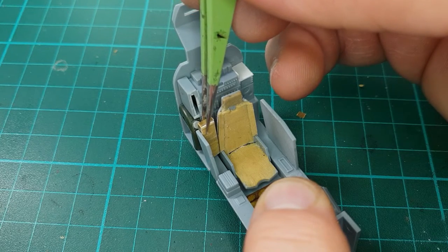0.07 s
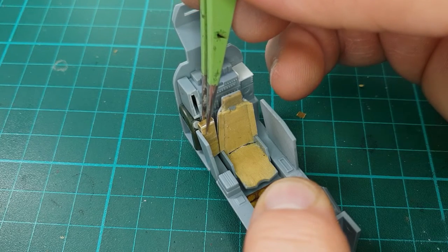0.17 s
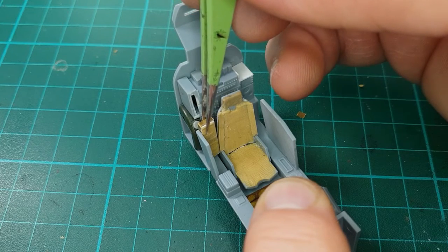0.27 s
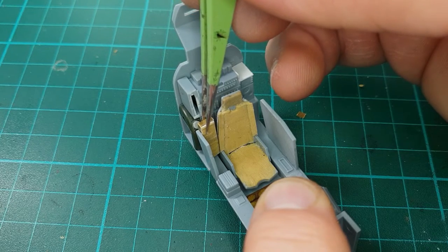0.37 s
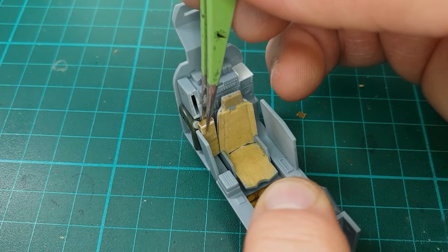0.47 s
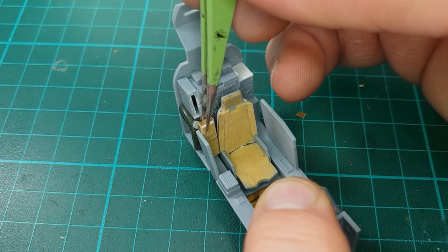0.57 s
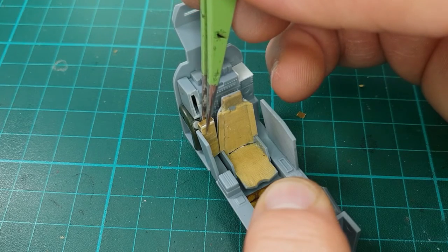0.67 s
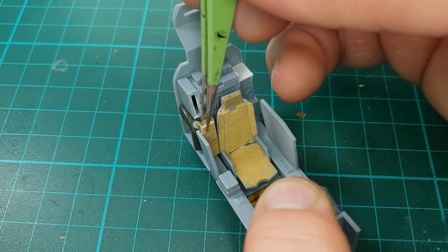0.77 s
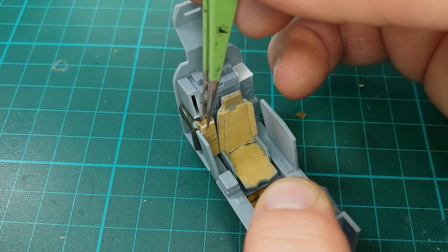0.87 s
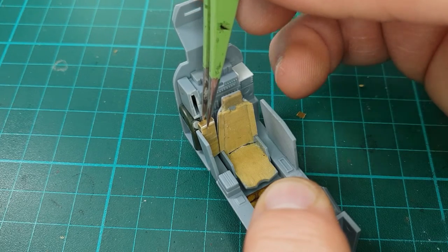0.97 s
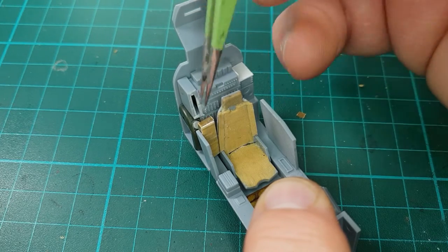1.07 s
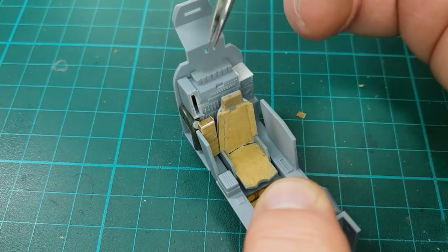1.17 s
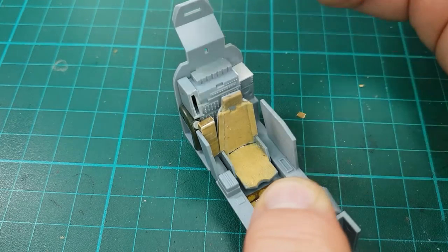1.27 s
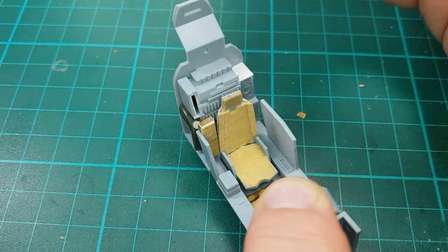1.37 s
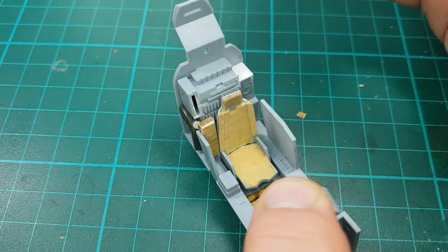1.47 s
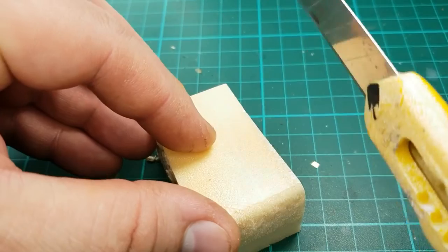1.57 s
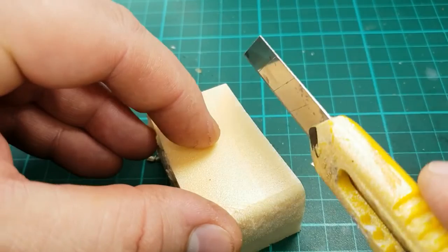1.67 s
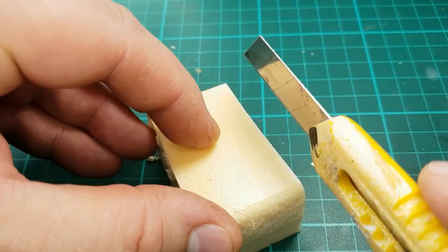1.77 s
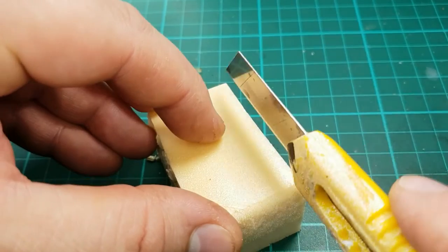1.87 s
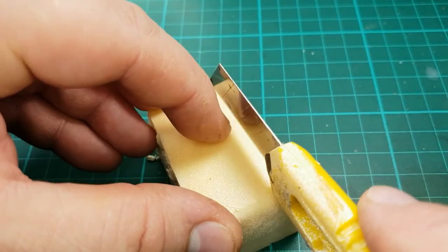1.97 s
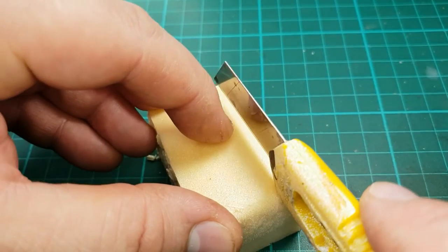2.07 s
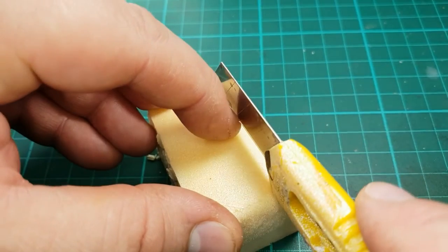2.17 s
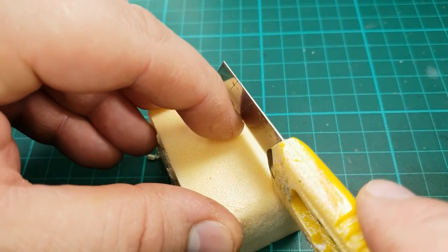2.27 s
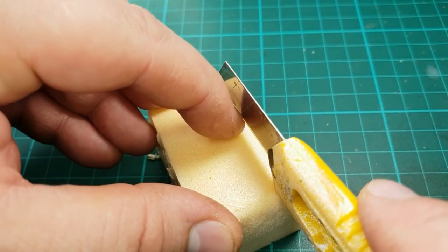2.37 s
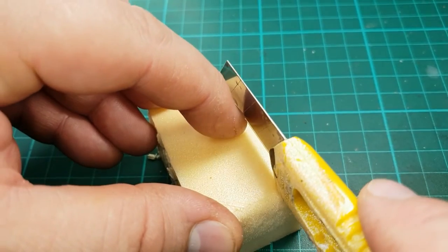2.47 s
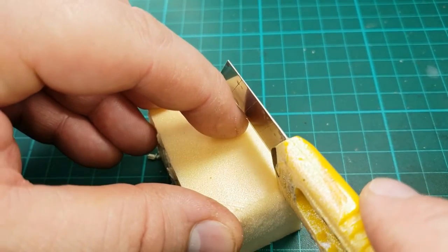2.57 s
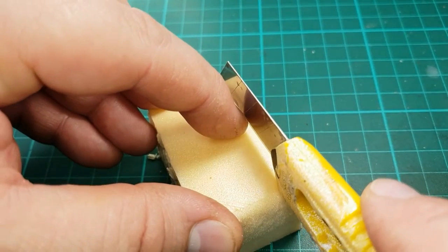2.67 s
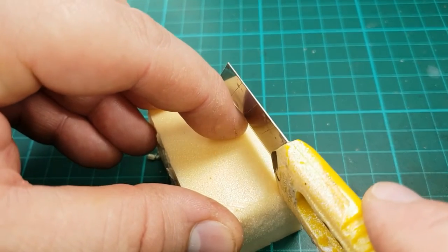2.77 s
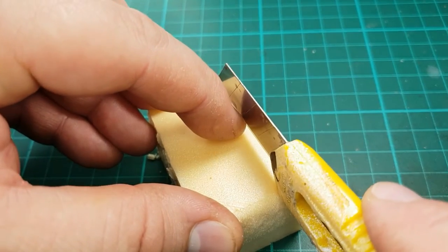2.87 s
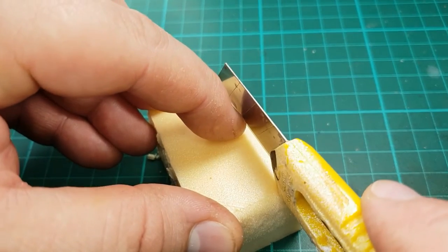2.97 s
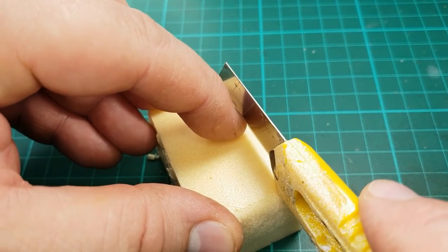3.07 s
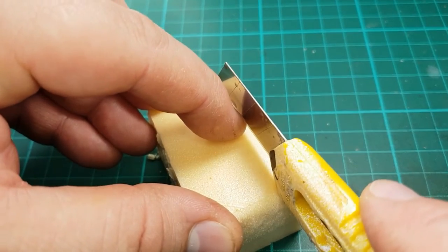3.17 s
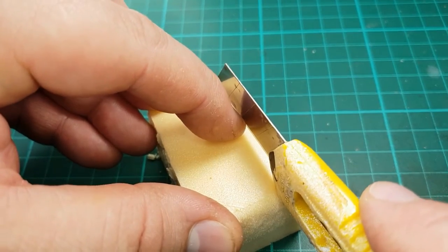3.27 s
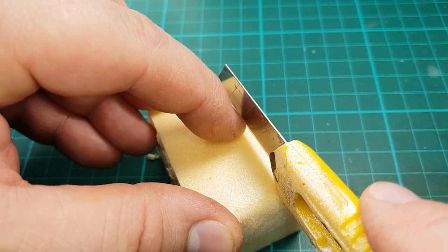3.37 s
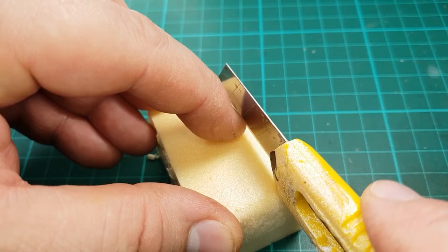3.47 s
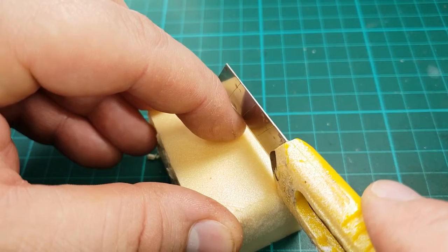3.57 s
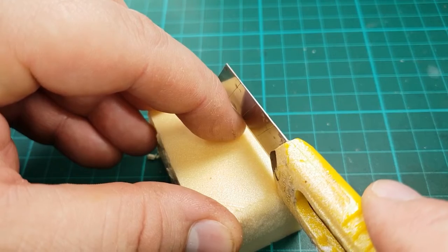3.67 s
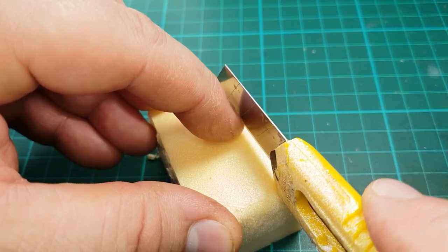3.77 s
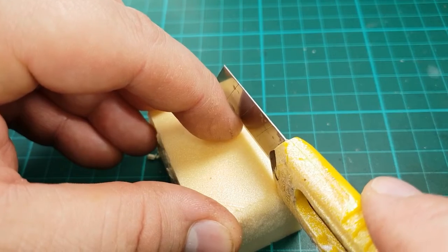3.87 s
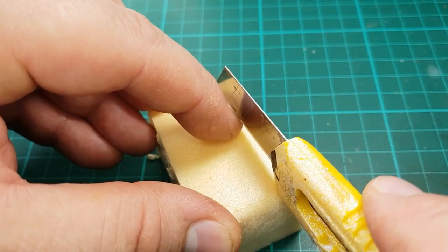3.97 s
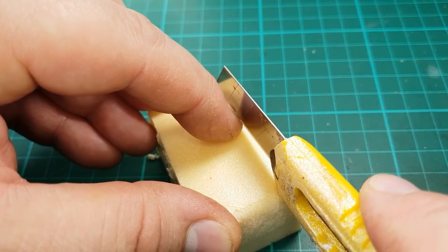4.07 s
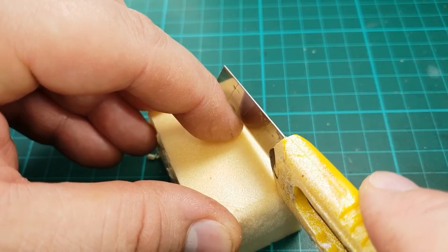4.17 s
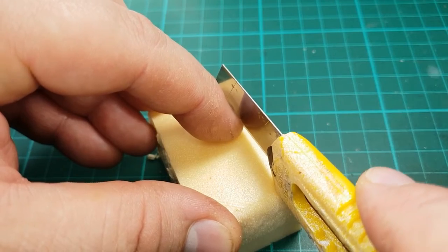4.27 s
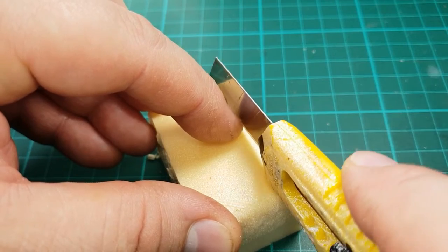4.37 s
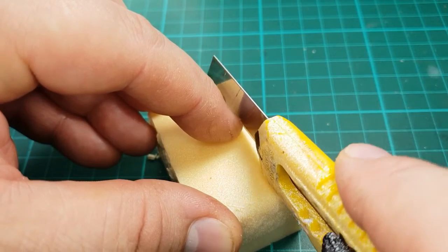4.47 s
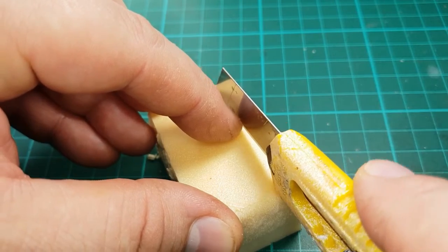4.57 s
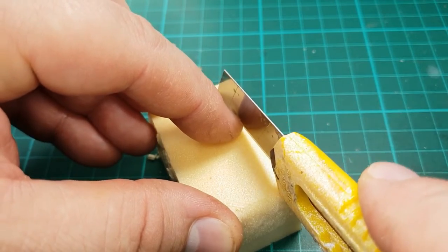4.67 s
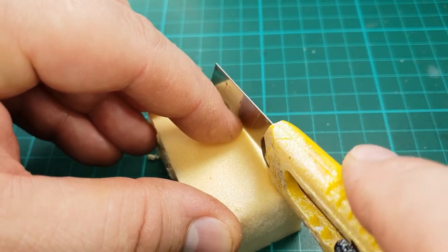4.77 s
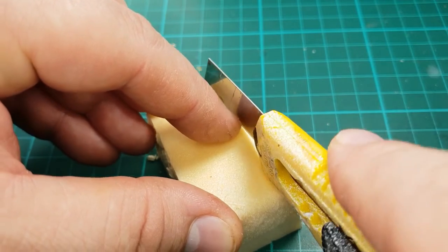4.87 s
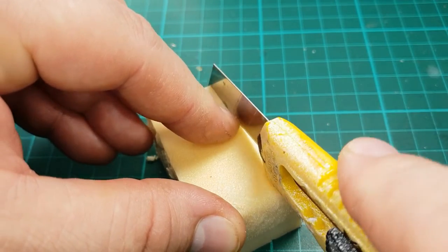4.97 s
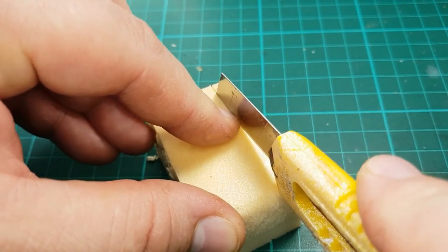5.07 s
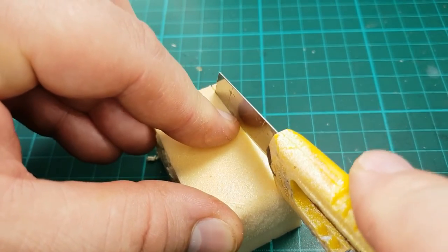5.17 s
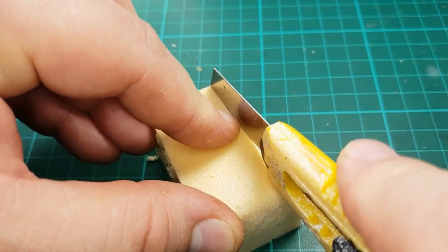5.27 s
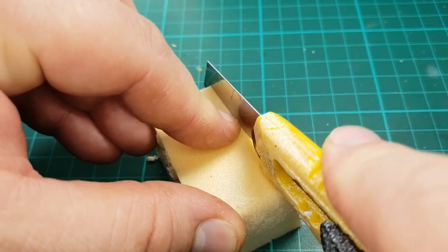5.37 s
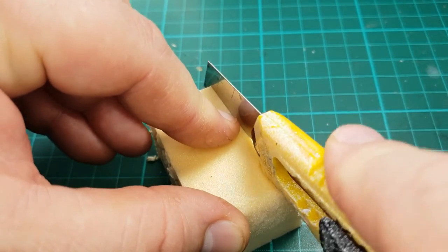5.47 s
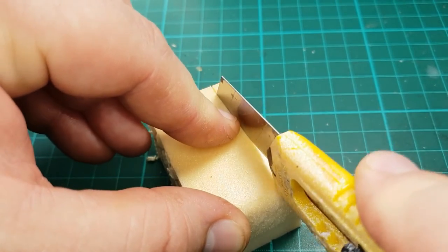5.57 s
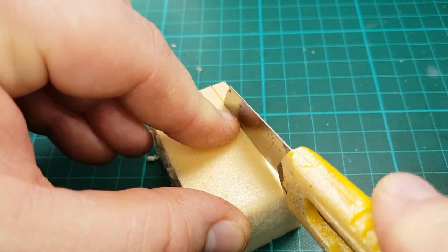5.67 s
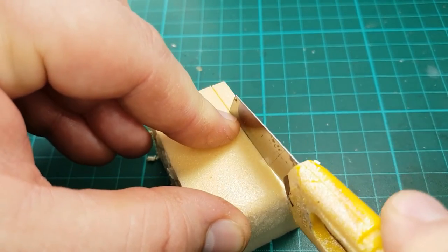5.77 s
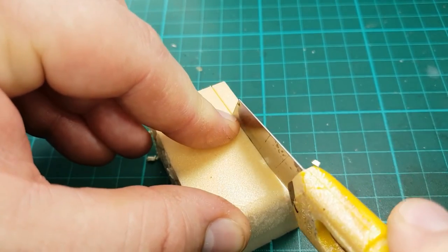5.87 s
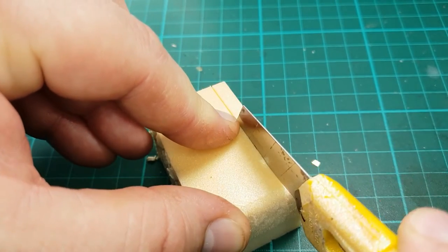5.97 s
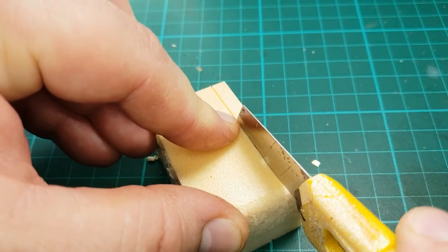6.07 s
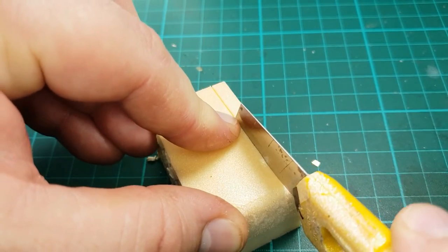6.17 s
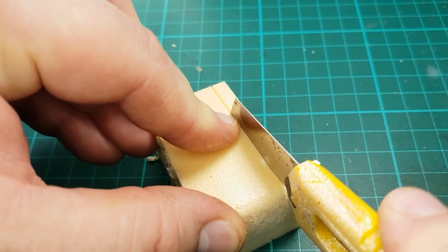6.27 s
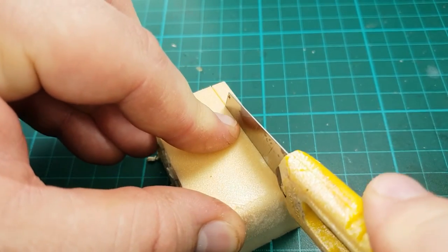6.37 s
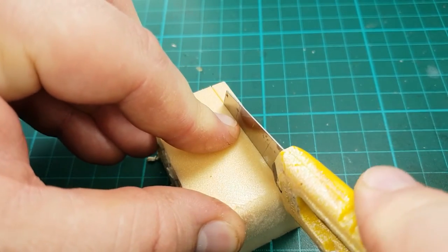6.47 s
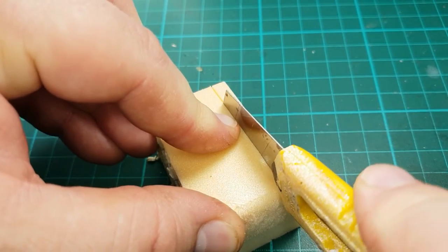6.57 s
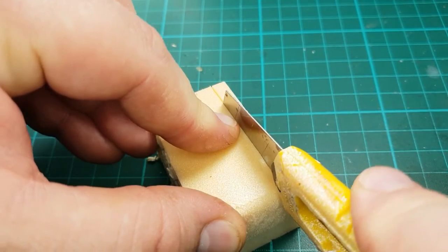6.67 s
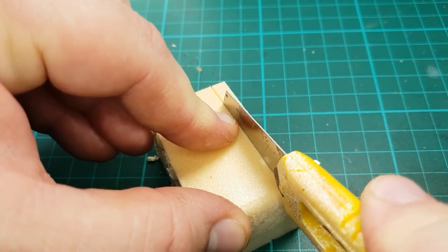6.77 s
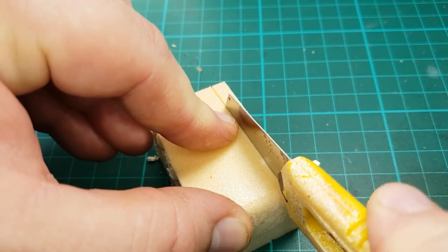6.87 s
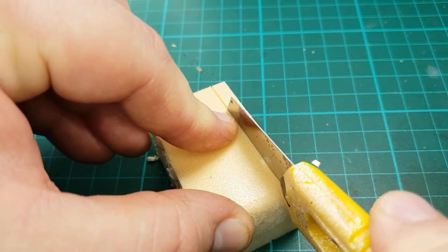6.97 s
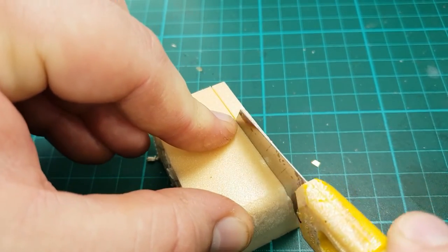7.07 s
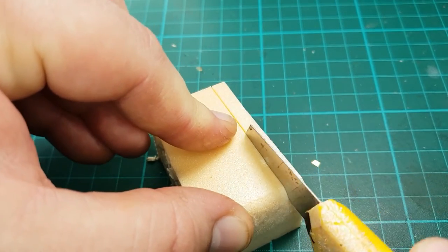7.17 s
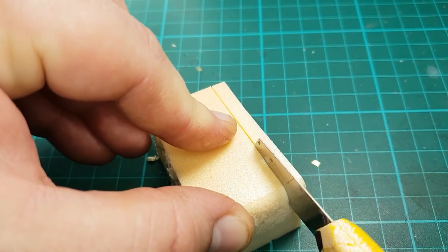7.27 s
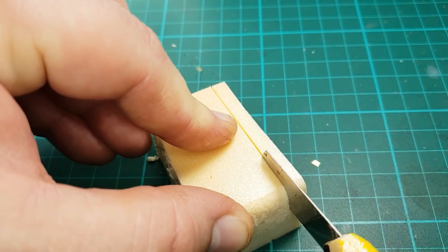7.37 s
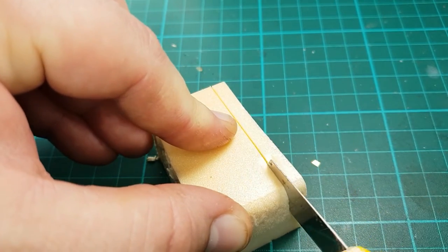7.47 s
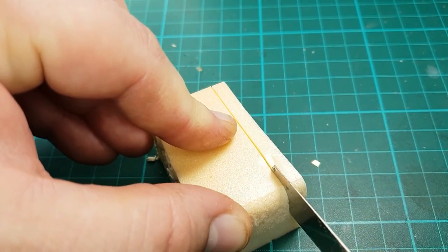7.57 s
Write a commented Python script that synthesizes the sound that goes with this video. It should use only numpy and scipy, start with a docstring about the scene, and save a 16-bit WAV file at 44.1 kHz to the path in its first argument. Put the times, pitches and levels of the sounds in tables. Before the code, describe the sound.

A close, dry view of bench work in a small room. From 0 to 1.3 s there is only quiet air noise and a faint wavering low hum, with a tiny click near 1.1 s and soft thumps around 1.4 s. At 1.6 s a low rumble steps up and slowly grows, as fingers scuff the foam with grainy rubs and little ticks, sparse until 3.9 s. A sharp tick at 4.0 s starts a run of small ticks. From 4.3 s the blade saws in short, bright, fizzing rasps. At 4.9 s it slips free with a loud, hard snap. Strokes continue, with a crisp tick at 5.2 s and soft hollow bench notes at 5.6 and 6.3 s. Cutting eases around 6.5 s amid a thin foam rustle; a dull thump lands at 6.8 s, then stronger rasps from 7.0 s fade toward 7.6 s.

```python
"""Close to the microphone in a small room: steady air noise and a faint, wavering hum that comes and goes.
At 1.58 s the low rumble steps up, then slowly grows; fingers scuff a small foam block, blade and foam tick.
From 4.3 s a snap-off craft knife saws it on a cutting mat: each stroke is a burst of foam cells, filtered by
resonances of knife and block. At 4.9 s the blade slips free with a loud snap; at 5.6 and 6.3 s something
on the bench rings as decaying sines. Thumps, knocks and hollow rubs are short bands of noise."""
import sys
import numpy as np
from scipy import signal
from scipy.fft import rfft, irfft
from scipy.io import wavfile
from scipy.ndimage import uniform_filter1d

SR = 44100
rng = np.random.default_rng(int(sys.argv[2]) if len(sys.argv) > 2 else 0)


def wav_record(signal):
    """Record a signal, one row per channel, as 16-bit PCM in the file named by sys.argv[1]."""
    frames = np.transpose(np.atleast_2d(signal))
    bounded = np.clip(frames, -1, 1)
    # unit amplitude maps onto the largest positive 16-bit level
    quanta = np.round(bounded * 32767).astype(np.int16)
    wavfile.write(sys.argv[1], SR, quanta)


N = 335601
EDGE_HZ = 15900  # upper band limit

# bright colour of bursting cells: hz, relative_db (per Hz)
FIZZ_COLOUR = [(1000, -42.5), (5000, -3), (6800, -7), (8000, 0), (10000, 4), (12000, 5.5), (13200, 3.5),
               (16000, -4)]


def amp(db):
    """Decibels to gain."""
    return 10 ** (np.asarray(db) / 20)


def evened(x):
    """Scales to rms 1."""
    return x / np.sqrt(np.mean(x ** 2) + 1e-20)


def read(points, hz):
    """Reads a spectrum in dB on a log-frequency axis."""
    f, value = np.transpose(points)
    return np.interp(np.log(hz + 1), np.log(f + 1), value)


def add(mix, s, sound):
    """Mixes a sound in at time s, in place."""
    part = mix[..., round(s * SR):][..., :sound.shape[-1]]
    part += sound[..., :part.shape[-1]]


def noise(points):
    """Noise of rms 1 with the given spectrum."""
    spectrum = rfft(rng.standard_normal(N))
    colour = amp(read(points, np.fft.rfftfreq(N, 1 / SR)))
    return evened(irfft(spectrum * colour, N))


def drift(per_s):
    """A random wander of rms 1, straight between per_s random values a second."""
    knots = rng.standard_normal(4000)
    return evened(np.interp(np.arange(N) / SR * per_s, np.arange(len(knots)), knots))


def swell(start, length, rise, fall):
    """Eases from 0 up to 1, holds, and eases back to 0."""
    t = np.arange(N) / SR - start
    onset = np.sin(np.pi / 2 * np.clip(t / rise, 0, 1))
    release = np.sin(np.pi / 2 * np.clip((length - t) / fall, 0, 1))
    return onset * release


def shares(body_db):
    """Splits unit power between dull body and bright fizz."""
    return np.array([[amp(body_db)], [1]]) / np.hypot(amp(body_db), 1)


def background(air_db=-64.0, step_s=0.016):
    """Steady air, a low rumble that steps up at 1.58 s, then slowly grows, and a wavering hum."""
    # the steady floor: hz, relative_db (per Hz)
    air_colour = [(12, -29), (22, -6.5), (58, -7.5), (92, -7), (150, -17), (200, -21), (290, -24),
                  (380, -30.5), (800, -34.5), (1500, -40), (4500, -43.5), (8500, -49), (12500, -42.5),
                  (16000, -44)]
    # the low rumble: hz, relative_db (per Hz)
    rumble_colour = [(20, -17), (33, -15), (47, -2), (65, -10.5), (100, -3.5), (165, 2.5), (235, -6.5),
                     (285, -4), (360, -16.5), (480, -14.5), (610, -34), (850, -26.5), (1200, -40),
                     (1600, -38), (3000, -50)]
    # faint hum: start_s, length_s, pitch_hz, level_db (rms)
    hums = [(0, 0.52, 94.8, -67.5), (.7, 0.28, 92, -70), (.92, 0.42, 117, -68.5)]
    step_at_s, hum_fade_s = 1.58, 0.1
    before_db, after_db, sway_db, growth_db_per_s = -74, -61, 1.0, 0.34

    t = np.arange(N) / SR - step_at_s
    stepped = np.clip(t / step_s, 0, 1)
    rumble_db = (1 - stepped) * before_db + stepped * (after_db + growth_db_per_s * t)
    rumble_db = rumble_db + sway_db * drift(4.2)
    rumble = amp(rumble_db) * noise(rumble_colour)

    clock = np.cumsum(1 + 0.031 * drift(25)) / SR  # uneven time makes the pitch waver
    hum = np.zeros(N)
    for start, length, hz, db in hums:
        hum += amp(db) * swell(start, length, hum_fade_s, hum_fade_s) * np.sin(2 * np.pi * hz * clock)
    hum = np.sqrt(2) * hum * amp(2 * drift(5.8))  # sqrt(2): from rms to peak
    return amp(air_db) * noise(air_colour) + rumble + hum


def bump(db, centre, width, rise, t60):
    """A narrow band of noise that swells and dies."""
    t, hz = np.arange(SR // 2) / SR, np.fft.rfftfreq(SR // 2, 1 / SR)
    random_phase = np.exp(2j * np.pi * rng.random(len(hz)))
    band = irfft(random_phase / (1 + (2 * (hz - centre) / width) ** 4), len(t))
    fade = np.minimum(t / rise, 1) * amp(-60 * np.maximum(t - rise, 0) / t60)
    return amp(db) * evened(band * fade) * np.sqrt(np.mean(fade ** 2))


def bumps():
    """Dull thumps, mid-range knocks, the body of the snap and hollow rubs, all as bands of noise."""
    # hands thumping the mat: start_s, level_db, centre_hz, t60_s
    thumps = [(1.358, -51, 127, 0.26), (1.381, -57.5, 60, 0.52), (1.466, -54, 61, 0.18),
              (2.138, -51, 130, 0.049), (2.47, -57.5, 268, 0.059), (6.824, -42.5, 172, 0.13)]
    # mid-range knocks of tools and block, and the body of the snap:
    # start_s, level_db, centre_hz, width_hz, t60_s
    mid_knocks = [(1.073, -63, 844, 240, .12), (2.242, -60.5, 2850, 250, 0.05),
                  (2.42, -61.5, 2840, 250, 0.05), (2.47, -69, 796, 600, .08),
                  (4.9277, -40.5, 1540, 1290, 0.15), (6.823, -51.5, 1200, 2210, 0.13)]
    # hollow rubs of the block, under the hands or the blade: start_s, level_db, centre_hz
    hollow_rubs = [(1.96, -73.5, 1490), (3.721, -67, 465), (4.77, -57.5, 1030), (5.235, -58.5, 960),
                   (5.575, -59, 680), (6.265, -59, 914), (6.39, -59.5, 1010), (7.139, -68, 960),
                   (7.25, -63, 960)]
    thump_rise_s, thump_width = 0.015, 1.13  # width as a share of the centre
    knock_rise_s = 0.001
    rub_width_hz, rub_rise_s, rub_t60_s = 330, 0.035, 0.38

    out = np.zeros(N)
    for s, db, hz, t60 in thumps:
        add(out, s, bump(db, hz, thump_width * hz, thump_rise_s, t60))
    for s, db, hz, width, t60 in mid_knocks:
        add(out, s, bump(db, hz, width, knock_rise_s, t60))
    for s, db, hz in hollow_rubs:
        add(out, s, bump(db, hz, rub_width_hz, rub_rise_s, rub_t60_s))
    return out


def bench_ring(rise_s=0.002):
    """Something on the bench gives a soft, hollow note when knocked: a few decaying modes."""
    # knocks: start_s, level_db
    knocks = [(5.575, -35.5), (6.295, -36)]
    # modes of the note: pitch_hz, level_db (relative to the knock), t60_s
    modes = [(514.4, -5, 0.19), (850, -23, 0.088), (1020, -25, 0.16)]

    out, t = np.zeros(N), np.arange(SR // 2) / SR
    note = sum(amp(db - 60 * t / t60) * np.sin(2 * np.pi * hz * t) for hz, db, t60 in modes)
    for s, db in knocks:
        add(out, s, amp(db) * note * (1 - np.exp(-t / rise_s)))
    return out


def knife_ring(colour, pose, size=4096):
    """Causal response, of energy 1, of the resonances of blade, handle and block over a broad colour."""
    # resonances: centre_hz, width_hz, level_db (over the broad colour, before the pose's strength)
    resonances = [(970, 110, 1.5), (1357, 76, -4.5), (1547, 110, 5.5), (1877, 117, 8), (2214, 150, 1),
                  (2750, 240, 10.5), (3166, 90, 10), (3680, 240, 12), (3996, 170, 10.5), (4660, 165, 8),
                  (4920, 66, 7), (5410, 220, -3), (5400, 100, -0.5), (6340, 130, 6.5), (6620, 120, -4.5),
                  (8140, 120, -7.5), (9150, 69, 7), (10300, 290, 5), (10755, 240, 5.5), (10900, 420, 4),
                  (11430, 140, 6.5), (11880, 210, 8), (12340, 490, 1), (13400, 370, 6.5), (13800, 120, 5),
                  (15270, 250, 9.5)]
    # antiresonances: centre_hz, width_hz, depth_db
    notches = [(1735, 59, 2.5), (2045, 70, 7.5), (2447, 62, 4), (3675, 85, 3.5)]

    strength_db, *extra_peak = pose
    hz = abs(np.fft.fftfreq(size, 1 / SR))
    peaks = [(f, width, db + strength_db) for f, width, db in resonances] + [extra_peak]
    power = 1 + sum(amp(db) ** 2 / (1 + ((hz - f) / width) ** 2) ** 4 for f, width, db in peaks)
    dips_db = sum(depth * np.exp(-((hz - f) / width) ** 2) for f, width, depth in notches)
    band_limit = 1 / np.sqrt(1 + (hz / EDGE_HZ) ** 100)
    gain = np.sqrt(power) * amp(read(colour, hz) - dips_db) * band_limit
    # minimum phase: the energy comes as early as this gain allows
    spectrum = np.exp(np.conj(signal.hilbert(np.log(gain + 1e-5))))
    ring = np.fft.ifft(spectrum).real[:size // 2]
    return ring / np.linalg.norm(ring)


def cells(per_s, spread_db):
    """Foam cells bursting at random moments, most small, a few large, scaled to rms 1."""
    size = amp(spread_db * np.minimum(rng.exponential(1, N), 4))
    sign = rng.choice([-1., 1.], N)
    bursting = rng.random(N) < per_s / SR
    return evened(size * sign * bursting)


def patchy(x, patch_db):
    """Uneven foam: the colour shifts in patches a few hundred Hz wide and some 40 ms long."""
    z = signal.stft(x, nperseg=256)[2]
    field = uniform_filter1d(rng.standard_normal(z.shape), size=4, axis=-2)  # across frequency
    field = uniform_filter1d(field, size=14, axis=-1)  # across time
    return signal.istft(z * amp(patch_db * evened(field)), nperseg=256)[1][..., :N]


def scuffing(rise_s=0.0074):
    """Fingers and blade scuff the block: short grainy rubs that swell and die away."""
    # rubs: start_s, level_db, body_db (relative to fizz), t60_s
    scuffs = [(1.608, -54, -8, 0.24), (1.66, -63, -2, 0.28), (1.844, -59, 2, 0.26), (1.935, -70.5, 9, 0.28),
              (2.135, -59, -0.5, 0.34), (2.284, -73, 1, 0.57), (2.42, -75, 4, 0.43),
              (2.505, -65.5, 11, 0.28), (2.589, -65.5, 3, 0.21), (2.656, -67.5, 9, 0.21),
              (2.899, -64.5, 3, 0.18), (3.05, -62.5, 10, 0.2), (3.137, -68.5, 14, 0.099),
              (3.295, -65, 6, 0.2), (3.821, -61.5, 4.5, 0.3), (3.965, -63, 3, 0.32),
              (4.065, -66.5, 0, 0.95), (6.818, -47, 6, .072)]
    # duller colour of a rub on the block's skin: hz, relative_db (per Hz)
    rub_colour = [(300, -1), (900, -8), (1500, 0.5), (2200, -0.5), (3000, 0), (4100, 7), (4700, 1.5),
                  (5600, 2), (6500, -4.5), (8000, -61), (16000, -32)]
    # block under the fingers: strength_db (of the resonances), peak_hz (extra peak), width_hz, peak_db
    gripped = (-4, 5930, 3000, -4)

    push, t = np.zeros((2, N)), np.arange(SR // 2) / SR
    for s, db, body_db, t60 in scuffs:
        envelope = np.minimum(t / rise_s, 1) * amp(db - 60 * np.maximum(t - rise_s, 0) / t60)
        add(push, s, shares(body_db) * envelope)
    body, fizz = patchy(push * cells(2400, 2.8), patch_db=2.4)
    dull = signal.oaconvolve(body, knife_ring(rub_colour, gripped))[:N]
    bright = signal.oaconvolve(fizz, knife_ring(FIZZ_COLOUR, gripped))[:N]
    return dull + bright


def straining(body_db=-22, pops_per_s=70, pop_spread_db=5, pop_t60=0.019, creep_db=-4, fade_s=0.016):
    """Squeezed foam creeps with a thin rustle and gives way in tiny, bright pops."""
    # under a resting blade or a firm grip: start_s, length_s, level_db
    strains = [(1.592, 0.46, -69.5), (4.104, 0.26, -68), (4.48, 0.98, -57.5), (6.038, 0.177, -69.5),
               (6.48, 0.216, -62), (6.755, 0.46, -57.5)]

    load = sum(amp(db) * swell(start, length, fade_s, fade_s) for start, length, db in strains)
    pop_fade = amp(-60 * np.arange(SR // 20) / SR / pop_t60)
    pops = signal.oaconvolve(abs(cells(pops_per_s, pop_spread_db)), pop_fade)[:N]
    activity = amp(creep_db) + np.minimum(evened(pops), 5)
    return shares(body_db) * load * evened(cells(8000, 4.1) * activity)


def cracks(rows, t60, trim_db):
    """Each is an avalanche of breaking cells: a burst of random signs with a quick decay."""
    out, t = np.zeros((2, N)), np.arange(SR // 12) / SR
    for s, db, body_db in rows:
        burst = rng.choice([-1., 1.], len(t)) * amp(db + trim_db - 60 * t / t60)
        add(out, s, shares(body_db) * burst)
    return out


def cutting(judder_db=0.48, tremor_db=0.5, loose_db=-54):
    """A fast blade bursts cells in a dense rasp; a slow one lets them go in separate crackles."""
    # knife strokes: start_s, length_s, level_db (fizz at mid-stroke and full speed),
    # lean_db (gain of pressure from start to end), rise_s (to full speed), body_db (relative to fizz)
    strokes = [(4.325, 0.21, -45.5, -3.5, 0.016, -3.5), (4.535, 0.19, -39.5, 2, 0.08, -4.5),
               (4.704, 0.2, -39, 1, 0.14, -3), (4.867, 0.14, -47.5, 5, 0.021, -1),
               (4.997, 0.17, -39, 1.5, 0.053, -3.5), (5.215, 0.14, -40.5, -6, 0.083, -4),
               (5.275, 0.23, -44, -4, 0.15, -4), (5.546, 0.21, -38.0, -6, 0.078, -4),
               (5.708, 0.23, -43.5, -8.5, 0.1, -2.5), (5.919, 0.13, -39, -2, 0.095, -5),
               (6.215, 0.3, -42, 2, 0.069, -7), (6.718, 0.11, -59.5, -1, 0.068, -9),
               (6.807, 0.13, -55.5, -14, 0.018, -6.5), (6.89, 0.11, -54, -4, 0.072, -2.5),
               (6.997, 0.25, -38.5, 1, 0.17, -4), (7.191, 0.19, -40.5, -17.5, 0.085, -3),
               (7.303, 0.29, -46.5, -9.5, 0.11, -1.5)]
    brake_s, speed_power = 0.07, 1.78  # all slow down alike; loudness goes as a power of blade speed

    t, power = np.arange(N) / SR, np.zeros((2, N))
    for start, length, db, lean_db, rise, body_db in strokes:
        speed = swell(start, length, rise, brake_s)
        pressure = amp(db + lean_db * (np.clip((t - start) / length, 0, 1) - .5))
        power += (amp([[body_db], [0]]) * pressure * speed ** speed_power) ** 2
    slow = 1 / (1 + power[1] / amp(loose_db) ** 2)  # share of separate crackles
    rasp = np.sqrt(1 - slow) * cells(15000, 2.2)
    crackle = np.sqrt(slow) * cells(1600, 2.2)
    unsteady = amp(judder_db * drift(180) + tremor_db * drift(35))
    return np.sqrt(power) * (rasp + crackle) * unsteady


def knife(body, fizz):
    """Fixed resonances change in strength, and one extra peak differs, crossfaded between poses."""
    # cutting, slipping free, cutting, buried deep: time_s, strength_db (of the resonances),
    # peak_hz (extra peak in the colour), width_hz, peak_db
    poses = [(4.6, 2, 11600, 500, 8.5), (4.931, 1, 5900, 600, 2.5), (5.149, -2.5, 4800, 514, -3),
             (7.299, -2, 1780, 1110, 3.5)]
    # duller colour of bursting cells: hz, relative_db (per Hz)
    body_colour = [(150, -38.5), (450, -7.5), (750, -16), (1300, -11.5), (2000, -7.5), (2700, -5),
                   (3600, -2), (5000, 3.5), (6800, 3), (7600, -11), (9000, -25), (16000, -35.5)]

    out, times = np.zeros(N), [pose[0] for pose in poses]
    for (_, *pose), only in zip(poses, np.eye(len(poses))):
        share = np.interp(np.arange(N) / SR, times, only)  # crossfade between poses
        for force, colour in ((body, body_colour), (fizz, FIZZ_COLOUR)):
            out += signal.oaconvolve(share * force, knife_ring(colour, pose))[:N]
    return out


def room(x, near_db=-14, near_t60=0.085, far_db=-25, far_t60=0.06):
    """Quick reflections from hands and bench, then a small room's faint tail, different at each channel."""
    t = np.arange(SR // 3) / SR
    echoes = rng.choice([-1., 1.], (3, len(t))) * (rng.random((3, len(t))) < 4000 / SR)
    near = echoes[0] * (t > .001) * amp(-60 * t / near_t60)
    far = echoes[1:] * (t > .008) * amp(-60 * t / far_t60)
    direct = t == 0
    response = direct + amp(near_db) * near / np.linalg.norm(near) + amp(far_db) * far / np.linalg.norm(far[0])
    return signal.fftconvolve(x[None], response / np.linalg.norm(response[0]), axes=1)[:, :N]


def scene(hiss_db=-82):
    """Every force on the foam rings knife and block; the two channels hear nearly the same."""
    # sharp ticks of blade and foam: start_s, peak_db (before trim), body_db (relative to fizz)
    ticks = [(1.071, -56.5, 0), (1.5836, -43, -19), (1.6141, -38.5, -37), (1.675, -41, -35),
             (1.8179, -53, -20), (1.8493, -41.5, -11), (1.9582, -44.5, -23), (1.998, -53, -18),
             (2.242, -51, 0), (2.4195, -51, 0), (3.2962, -42, 15), (3.963, -25.5, -1), (4.0606, -33.5, -3),
             (4.0797, -36, -28), (4.1114, -37.5, -40), (4.1544, -38, -41), (4.1895, -42, -41),
             (4.265, -41, -30.5), (4.2873, -39.5, -43), (4.317, -33, -31), (4.3337, -34, -26),
             (4.3533, -26, -32), (4.3939, -28, -29), (4.5465, -48, -24), (4.778, -25, -3),
             (4.9955, -30.5, 12), (5.2428, -21.5, -38), (5.4674, -37, -32), (5.493, -31, -26),
             (5.558, -34, -0.5), (6.6598, -41, -19), (6.6767, -47, -23), (6.8244, -41, 3)]
    # the blade snapping free, with a quick echo: start_s, peak_db (before trim), body_db (relative to fizz)
    snap = [(4.9281, -10, -4), (4.9308, -19.5, -19.5), (4.9346, -16, -3)]

    forces = patchy(cutting() + straining(), patch_db=1.67)
    forces = forces + cracks(ticks, t60=0.025, trim_db=-6.5) + cracks(snap, t60=0.015, trim_db=1)
    body, fizz = forces
    in_room = room(knife(body, fizz) + scuffing() + bench_ring())
    hiss = amp(hiss_db) * rng.standard_normal((2, N))  # each channel's own faint hiss
    return in_room + bumps() + background() + hiss


def record(dry):
    """The recorder's band limit: a steep low-pass."""
    low_pass = signal.firwin(255, EDGE_HZ, window=("kaiser", 8), fs=SR)
    return signal.oaconvolve(dry, low_pass[None], "same")


dry = scene()
out = record(dry)
wav_record(out)
```